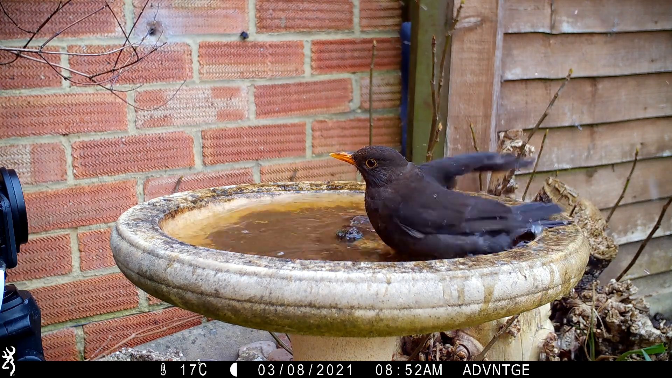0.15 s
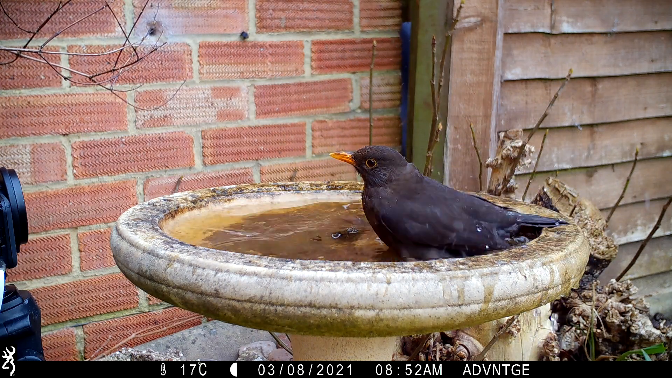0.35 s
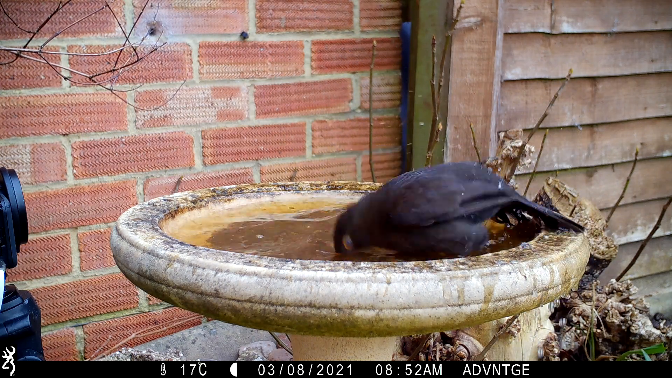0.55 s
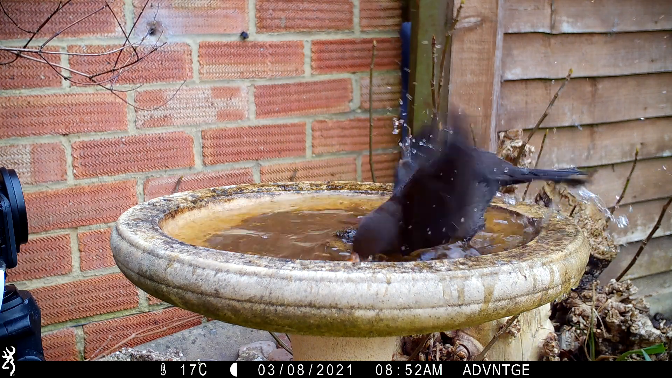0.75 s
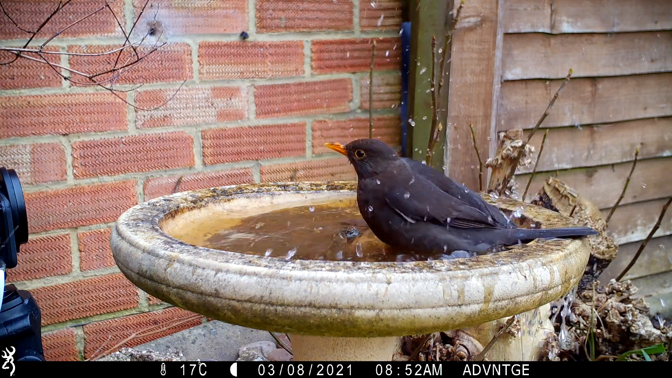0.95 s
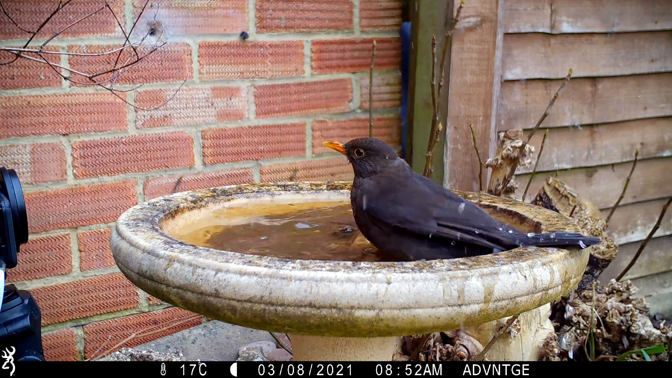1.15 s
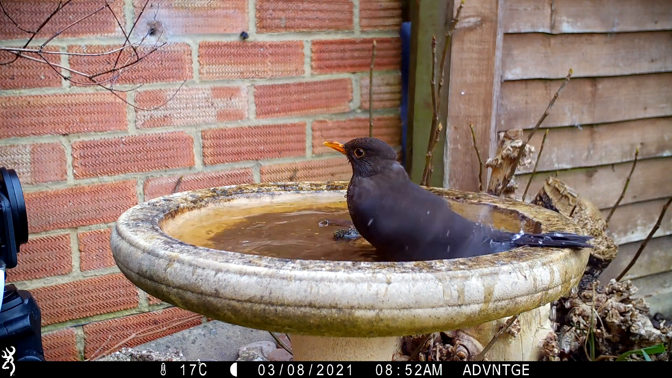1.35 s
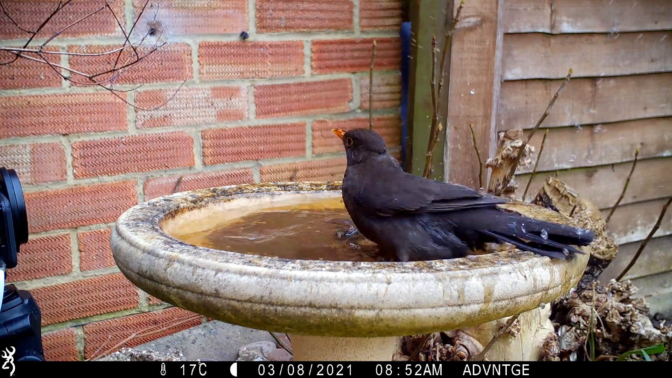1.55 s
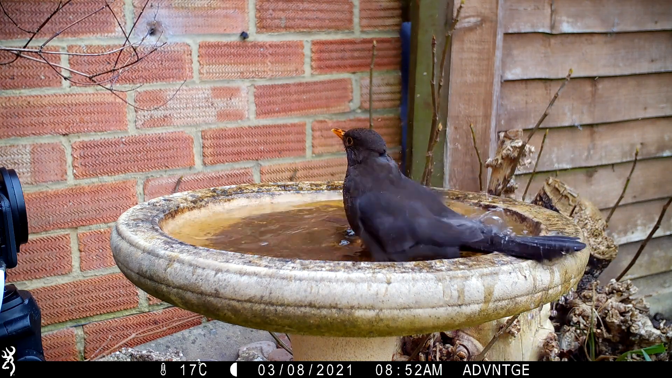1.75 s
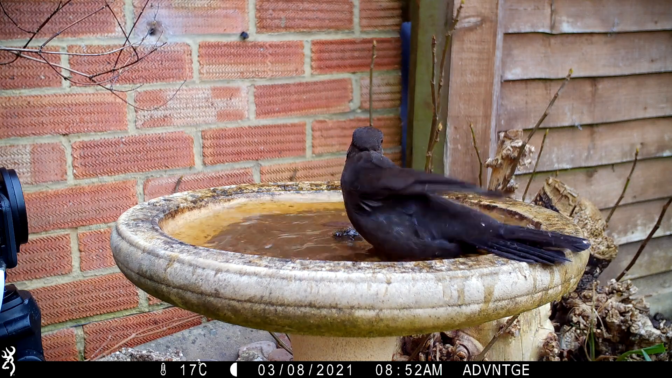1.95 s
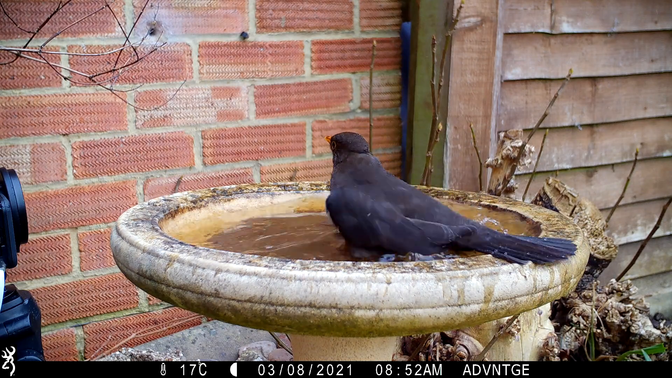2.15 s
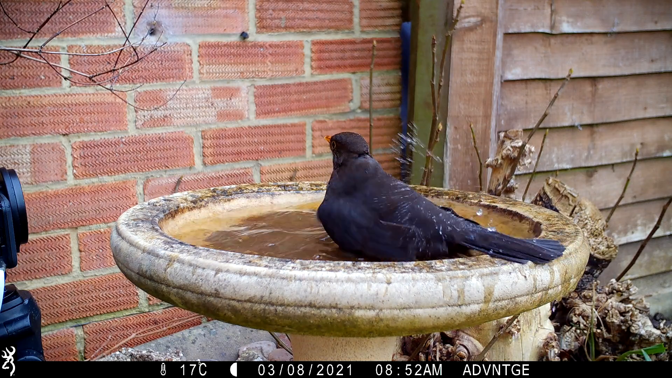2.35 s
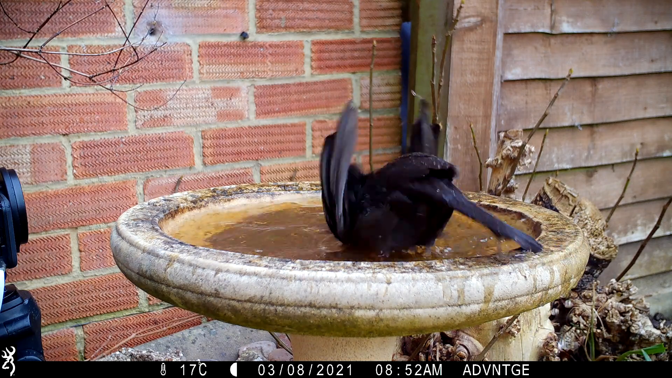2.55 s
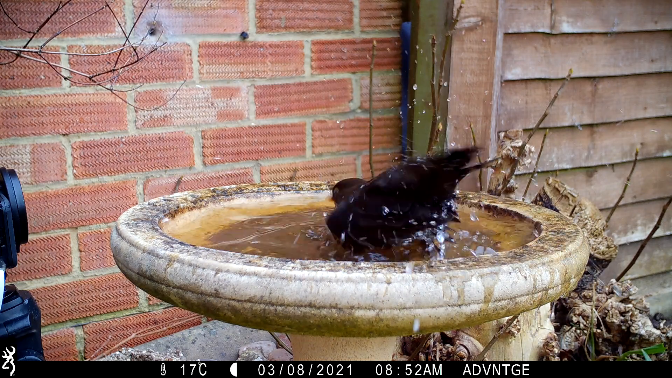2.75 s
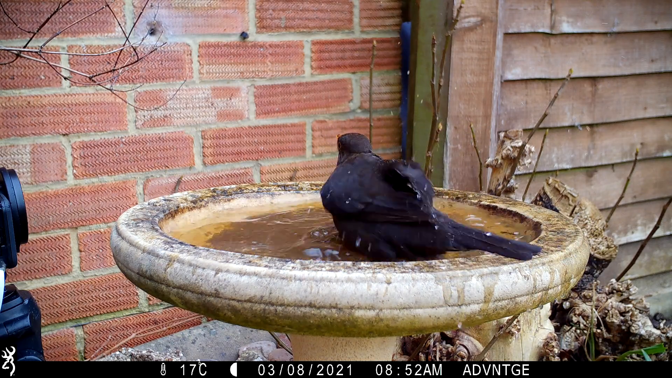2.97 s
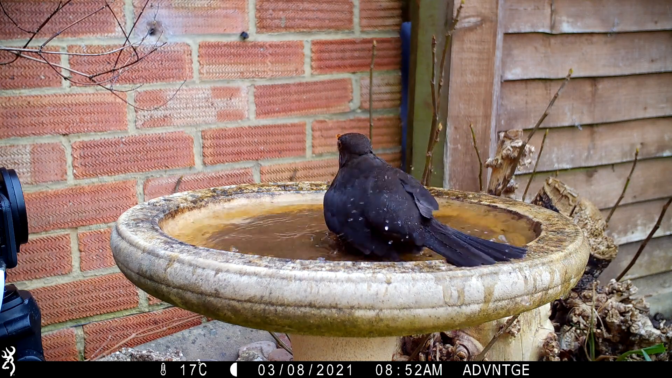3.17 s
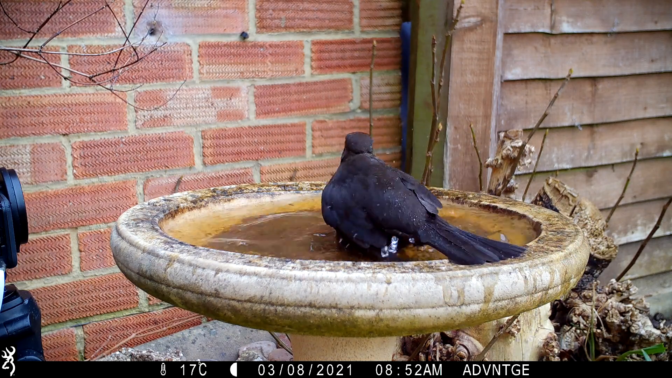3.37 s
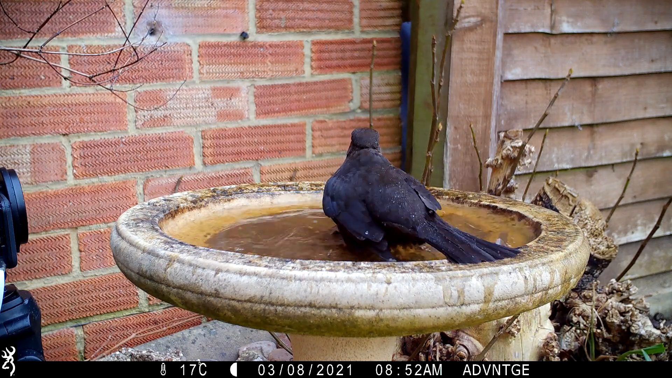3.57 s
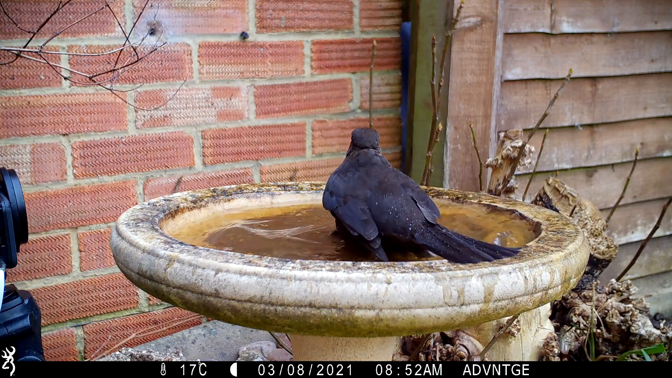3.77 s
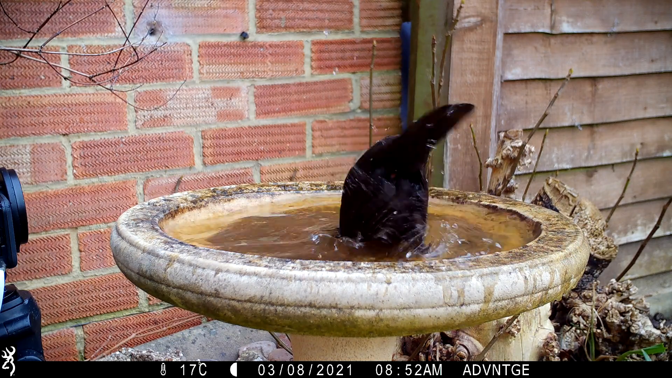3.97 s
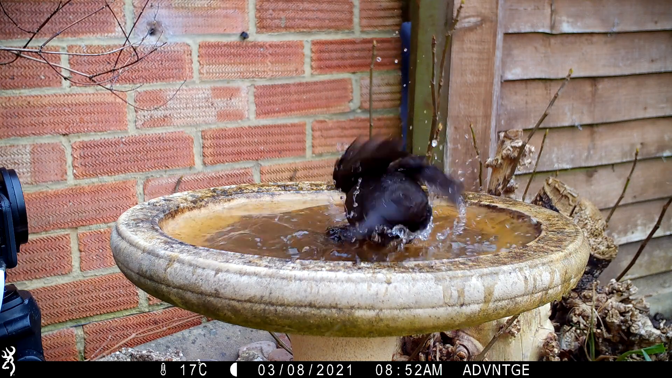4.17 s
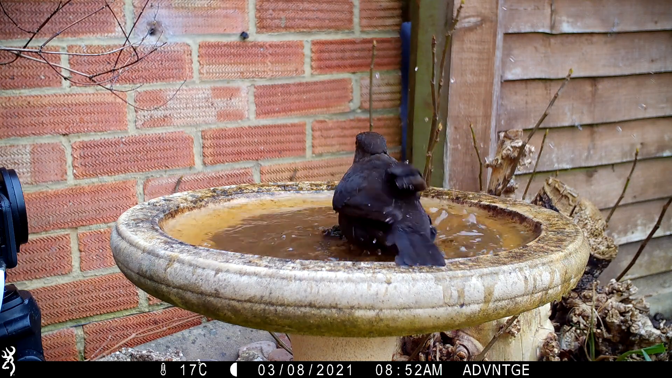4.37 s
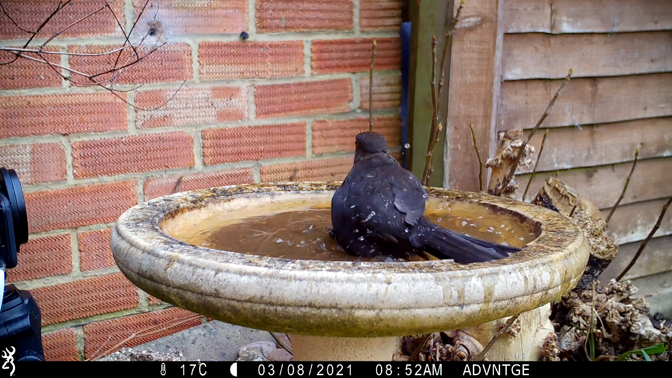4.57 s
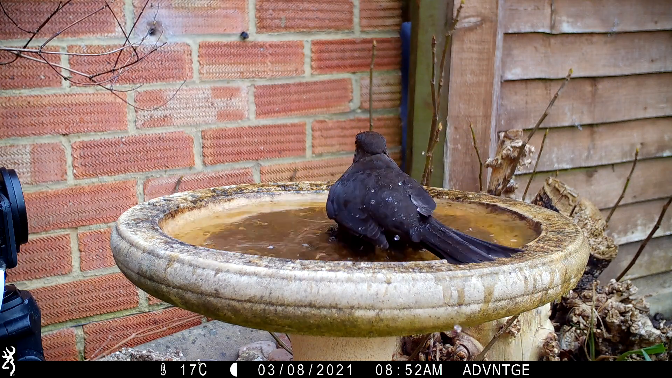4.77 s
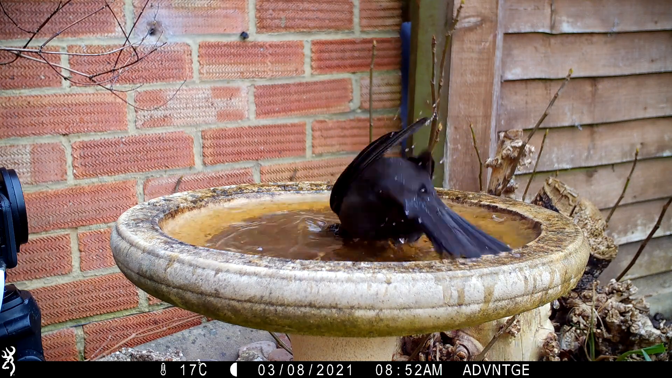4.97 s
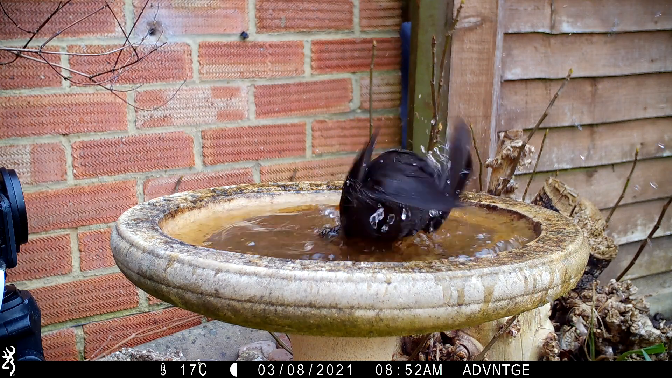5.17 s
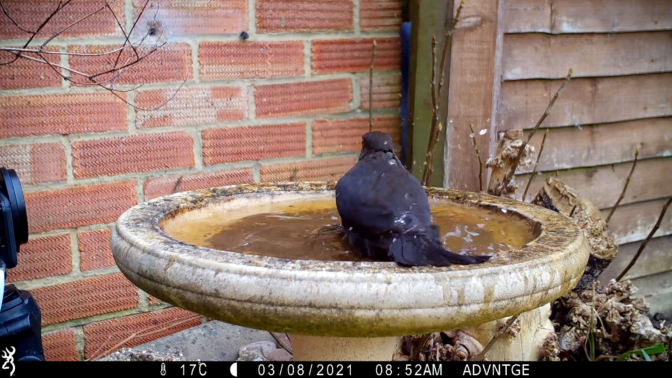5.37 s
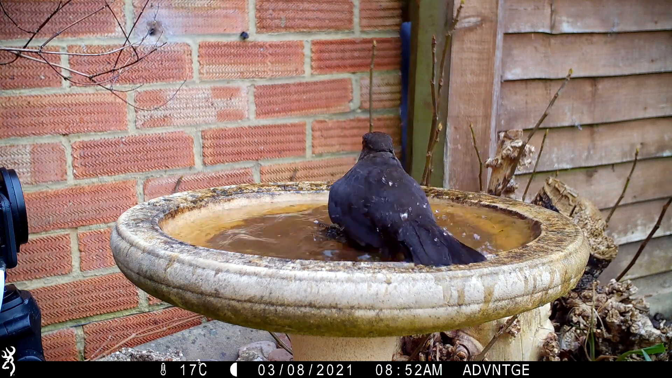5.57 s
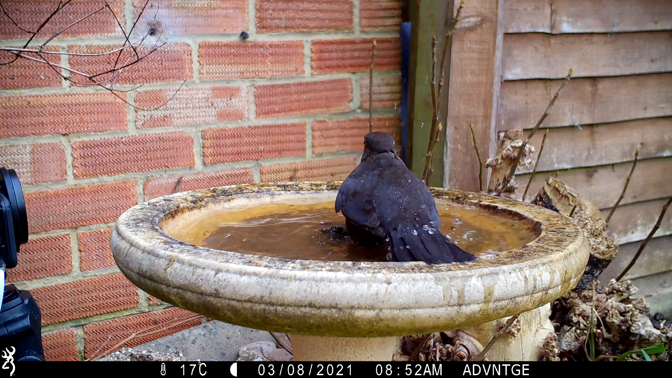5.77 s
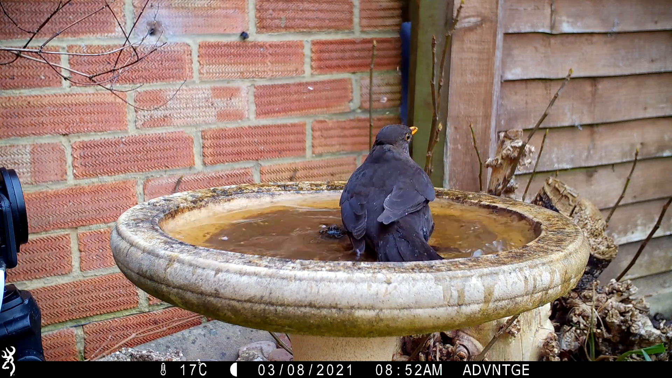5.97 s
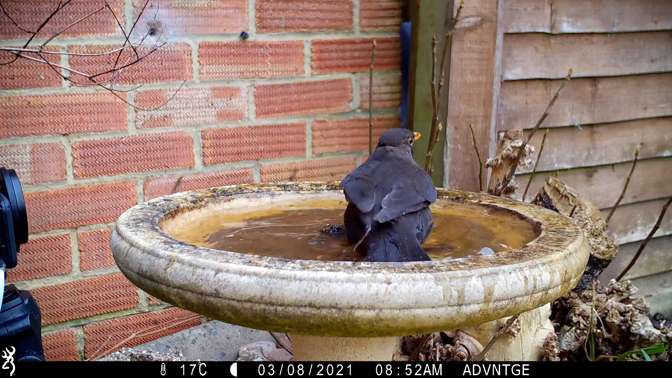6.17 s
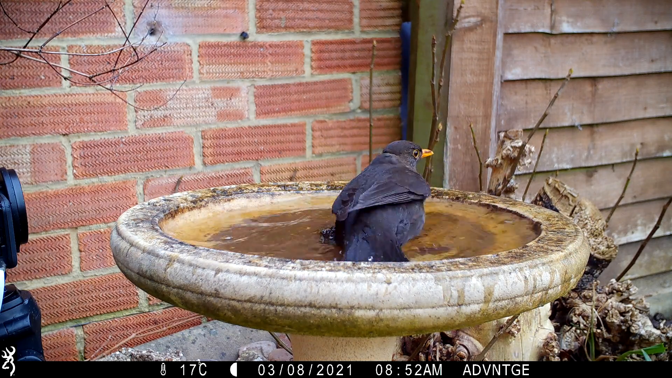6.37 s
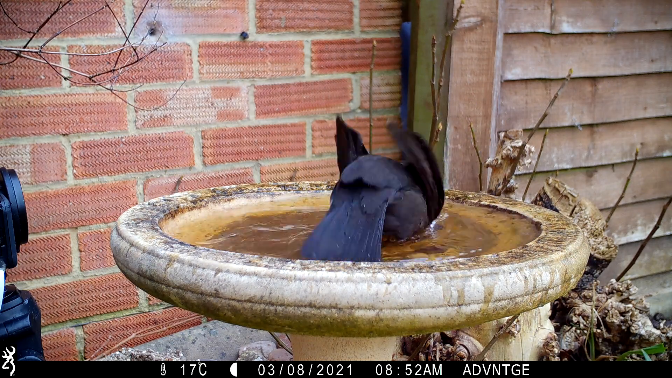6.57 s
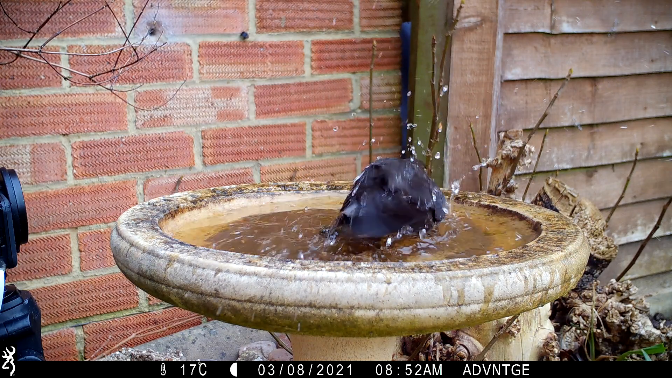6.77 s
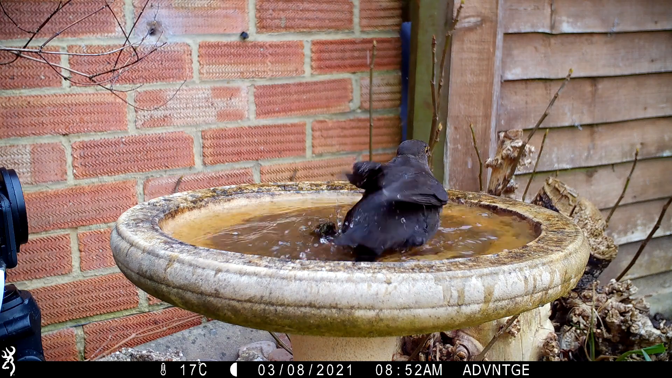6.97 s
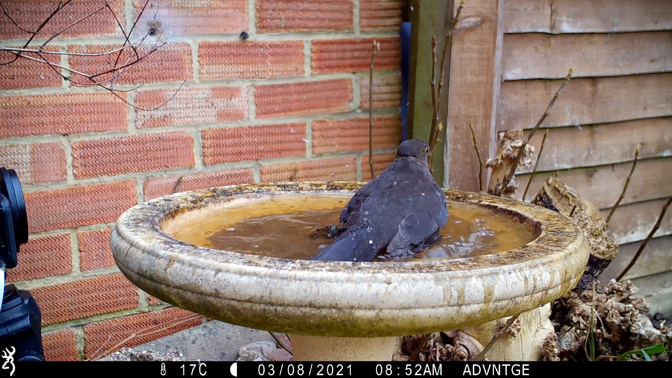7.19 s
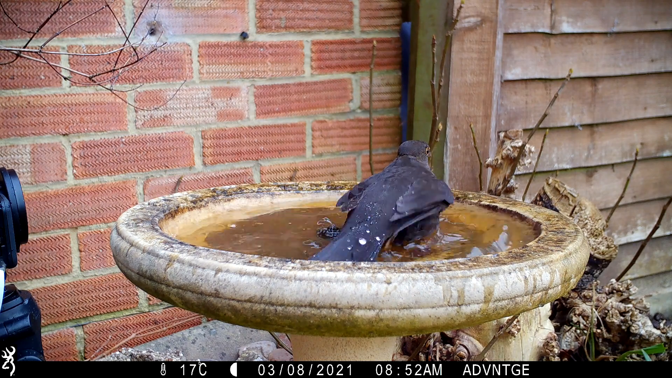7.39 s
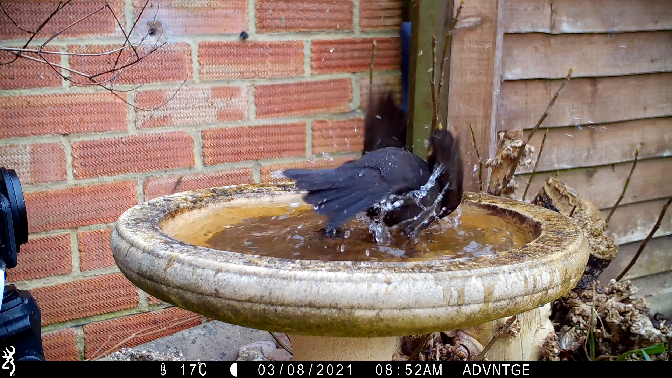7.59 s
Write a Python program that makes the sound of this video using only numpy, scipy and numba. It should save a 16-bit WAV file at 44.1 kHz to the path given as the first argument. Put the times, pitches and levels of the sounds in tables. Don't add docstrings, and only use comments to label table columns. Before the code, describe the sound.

Quick crisp wing slaps and small watery splashes in a garden birdbath, with drips, light sloshing, faint distant traffic and thin birdsong.

```python
import sys
import numpy as np
from scipy import signal
from scipy.fft import rfft, irfft, next_fast_len
from scipy.io import wavfile
from scipy.ndimage import uniform_filter1d
from numba import njit

SR = 44100
rng = np.random.default_rng(int(sys.argv[2]) if len(sys.argv) > 2 else 0)


def gain_from_db(level_db):
    decades = np.asarray(level_db, float) / 20
    return 10 ** decades


def waveform_to_disk(signal):
    frames = np.transpose(np.atleast_2d(signal))
    scaled = np.clip(frames, -1, 1) * 32767
    samples = np.round(scaled).astype(np.int16)
    wavfile.write(sys.argv[1], SR, samples)


N = 336483

# t/s, peak level/dB, air pocket f/Hz, crackle level/dB, air thud level/dB
WINGBEATS = [
    (1.3973, -35.5, 1900, 0, 0),
    (1.5414, -14, 1320, -16, -19),
    (1.663, -35.5, 1050, -1, 6.5),
    (1.669, -25.5, 1290, -11, -22),
    (1.794, -9, 1110, -26, -40),
    (1.908, -19.5, 1450, -6, -23),
    (1.9106, -12, 3240, -31, -15.5),
    (2.036, -5.5, 1250, -21, -57),
    (2.173, -36, 1590, -2.5, -2),
]


def band(x, lo_hz, hi_hz):
    return signal.sosfilt(signal.butter(2, [lo_hz, min(hi_hz, .45 * SR)], "bandpass", fs=SR, output="sos"), x)


def noise(lo_hz, hi_hz, size=N):
    x = band(rng.standard_normal(size), lo_hz, hi_hz)
    return x / x.std()


def add(out, s, x):
    i = max(int(s * SR), 0)
    out[i:i + len(x)] += x[:len(out) - i]


def fade(t60, rise):
    t = np.arange(int(max(t60, .001) * SR) + 8) / SR
    e = (1 - np.exp(-(t / rise) ** 2)) * np.exp(-np.log(1000) * t / max(t60, .001))
    return e / e.max()


def walk(rate):
    k = int(SR / rate)
    held = np.repeat(rng.standard_normal(N // k + 1), k)
    return uniform_filter1d(uniform_filter1d(held, k), k)[:N]


def ring(hz, t60, rise, climb=0., ramp_s=1.):
    e = fade(t60, rise)
    octaves = np.minimum(climb * (np.arange(len(e)) / SR) ** 2 / ramp_s, 2)
    pitch = np.minimum(hz * 2 ** octaves, .45 * SR)
    return e * np.sin(2 * np.pi * np.cumsum(pitch) / SR)


def clap(hz, width_s):
    t = np.arange(-66, 200) / SR
    return -np.exp(-(t / width_s) ** 2) * np.sin(2 * np.pi * hz * t) * 0.73


@njit
def scatter(size, start, step, cycles, gain, rise, climb):
    out = np.zeros(size)
    for k in range(len(start)):
        phase = 0.
        for i in range(min(int(cycles[k] / step[k]), size - start[k])):
            u = i * step[k]
            phase += min(step[k] * 2 ** (climb * u), .45)
            e = (1 - np.exp(-(u / rise) ** 2)) * np.exp(-6.9 * u / cycles[k])
            out[start[k] + i] += gain[k] * e * np.sin(2 * np.pi * phase)
    return out


def far_traffic():
    # f/Hz, level/dB per Hz
    colour_table = [(20, -16.5), (160, -11), (310, -6.5), (620, -6), (1120, -6), (1500, -1), (3500, -7.5),
                    (4600, -21), (5800, -29.5), (7000, -41), (8600, -44), (12000, -43), (16000, -46.5)]
    # f/Hz, width/Hz, level/dB
    housing = [(399, 25.6, 2), (630, 68, 5.5), (995, 151, 3.5), (1479, 77, 3.5), (1890, 65, -33),
               (2630, 150, -3.5), (3514, 21, -1)]
    size = next_fast_len(N + N % 2, True)
    f = np.maximum(np.arange(size // 2 + 1) * SR / size, 1)
    hz, db = np.transpose(colour_table)
    peaks = sum(gain_from_db(g) ** 2 / (1 + (2 * (f - c) / w) ** 2) for c, w, g in housing)
    colour = gain_from_db(np.interp(np.log(f), np.log(hz), db)) * np.sqrt(1 + gain_from_db(14) * peaks)
    spectrum = rfft(rng.standard_normal(size)) * colour
    swell, out = walk(0.71), 0
    for octave in np.arange(4, 14.6, .5):
        part = np.clip(1 - 2 * abs(np.log2(f) - octave), 0, 1)
        out = out + irfft(spectrum * part, size)[:N] * gain_from_db(.8 * swell + 1.5 * walk(9))
    return out / out.std() * gain_from_db(-49.5)


def camera():
    hum_settings = (63, 27, -80.5, 101, -73)
    whine_hz, whine_db, flip_hz = 7796.3, -79.5, 29.78
    t = np.arange(N) / SR
    hz, width, db, mains_hz, mains_db = hum_settings
    rumble = gain_from_db(db) * noise(hz - width / 2, hz + width / 2)
    hum = gain_from_db(mains_db + 2.2 * walk(6)) * np.sin(2 * np.pi * mains_hz * t)
    flips = np.tanh(16 * np.sin(2 * np.pi * flip_hz * (t - .0133)))
    return rumble + hum + gain_from_db(whine_db + 3.5) * flips * np.sin(2 * np.pi * whine_hz * t)


def songbirds():
    # t/s, length/s, start f/Hz, end f/Hz, level/dB
    whistles = [(0.608, 0.055, 3930, 3860, -57.5), (2.225, 0.11, 4220, 4380, -68),
                (3.017, 0.051, 4970, 5200, -73), (3.283, 0.096, 3380, 3265, -59),
                (4.887, 0.014, 4090, 3800, -54), (4.898, 0.021, 4330, 3930, -55),
                (4.927, 0.011, 3690, 4160, -53), (4.968, 0.014, 4090, 3840, -54),
                (5.042, .016, 4300, 4200, -60), (5.082, 0.019, 3770, 4400, -58),
                (5.092, 0.0064, 4370, 4030, -57), (5.126, 0.017, 4550, 4440, -60),
                (5.143, 0.018, 4000, 3330, -55.5), (5.169, 0.0132, 3900, 4840, -57),
                (5.22, 0.014, 4000, 4080, -57), (5.23, 0.021, 5040, 4260, -65),
                (5.254, 0.026, 3740, 4130, -61), (5.282, .034, 3800, 3720, -55.5),
                (5.334, 0.022, 4100, 4200, -60), (5.356, .012, 4800, 4340, -61),
                (5.419, 0.026, 3950, 4340, -60), (5.45, .011, 4230, 3950, -58),
                (5.513, 0.032, 4160, 3980, -60), (5.83, 0.09, 4130, 4180, -67),
                (4.993, .025, 4000, 3820, -66), (5.176, .02, 4480, 4600, -67),
                (5.31, 0.012, 3700, 3300, -67), (5.38, .03, 4450, 4500, -70), (5.44, .015, 4500, 4760, -64)]
    # delay t/s, level/dB
    echoes = [(.011, -11), (.027, -12), (.052, -14)]
    out, waver = np.zeros(N), 1 + .012 * walk(220)
    for s, long, hz0, hz1, db in whistles:
        u = np.linspace(0, 1, max(int(long * SR), 8))
        pitch = (hz0 + (hz1 - hz0) * u) * waver[int(s * SR):][:len(u)] ** min(.02 / long, 1)
        swell = np.sqrt(np.sin(np.pi * u).clip(0))
        add(out, s, gain_from_db(db + 6.0) * swell * np.sin(2 * np.pi * np.cumsum(pitch) / SR))
    e = fade(0.4, rise=0.01)
    blur = signal.fftconvolve(out, e * rng.standard_normal(SR)[:len(e)])[:N]
    heard = out * gain_from_db(4 * walk(160)) + gain_from_db(-41) * blur
    for delay, db in echoes:
        add(heard, delay, gain_from_db(db) * out)
    return heard


def knocks():
    # t/s, peak level/dB, blow f/Hz, ring level/dB, bounce after t/s
    blows = [
        (0.6008, -15.5, 1950, -11, .004),
        (3.9241, -12.5, 2150, -15, .0042),
        (5.0058, -13, 1950, -22, .004),
        (6.5875, -16, 1900, -9.5, .0042),
        (7.488, -13.5, 1950, -13, .004),
    ]
    # f/Hz, level/dB, 60 dB fall t/s
    casing = [(1787, 0, .075), (1690, -11, .05), (1340, -13, .06), (2400, -13, .03), (1000, -4, .012)]
    out, shake, e = np.zeros(N), gain_from_db(2.5 * walk(250)), fade(.03, rise=.001)
    t = np.arange(-66, 100) / SR
    bump = np.exp(-(t / np.where(t < 0, .00036, .00052)) ** 2)
    for s, db, hz, ring_db, bounce_s in blows:
        grit = rng.standard_normal(SR // 10)
        add(out, s, gain_from_db(db) * bump * np.cos(2 * np.pi * hz * t))
        add(out, s + bounce_s, gain_from_db(db - 10) * clap(2100, width_s=.0004))
        add(out, s + .002, gain_from_db(db - 10) * e * band(grit, 900, 2600)[:len(e)])
        for mode_hz, mode_db, t60 in casing:
            tone = ring(mode_hz, t60, rise=0.001)
            level = gain_from_db(db + ring_db + mode_db)
            add(out, s + 0.001866, level * tone * shake[int(s * SR):][:len(tone)])
    return out


def grains(gain, lo_hz, hi_hz, cycles, spread_db, tilt_db, count):
    when, pitch, big, long = rng.random((count, 4)).T
    size_db = spread_db * np.minimum(-np.log(1 - big), 4) + tilt_db * pitch
    start = (when * N).astype(np.int64)
    step = lo_hz * (hi_hz / lo_hz) ** pitch / SR
    out = scatter(N, start, step, cycles * (.5 + long * 2), gain_from_db(size_db), 0.44, 0.0036)
    return out / out.std() * gain


def sloshing():
    # t/s, level/dB
    stir = [
        (0, -48.5),
        (2.07, -51.5),
        (2.38, -54),
        (2.95, -47.5),
        (3.39, -54.5),
        (4.25, -48.5),
        (5.71, -53),
        (6.5, -51.5),
        (7.6, -52),
    ]
    slosh_db = np.interp(np.arange(N) / SR, *np.transpose(stir))
    gain = gain_from_db(slosh_db - 5 + 3 * walk(14))
    return grains(gain, 1200, 3900, cycles=20, spread_db=2.6, tilt_db=-3, count=2200)


def shower_gain(column):
    # t/s, length/s, spray level/dB, finest mist level/dB
    showers = [(0.037, 0.12, -59, -75), (0.15, 0.087, -56, -85), (0.255, 0.069, -69, -80),
               (0.331, 0.066, -60.5, -81), (0.587, 0.038, -71, -79), (0.714, .04, -66, -84),
               (0.78, 0.15, -66, -89), (1.115, 0.18, -68, -77), (1.19, 0.22, -68, -84),
               (1.37, 0.2, -72, -89), (1.514, 0.13, -62, -94), (1.783, 0.2, -69, -93),
               (2.02, 0.091, -65, -81), (2.324, 0.047, -64, -97), (2.74, 0.15, -63, -100),
               (3.143, 0.03, -63, -82), (4.127, 0.063, -68, -87), (4.18, 0.085, -69, -80),
               (4.287, 0.035, -77, -93), (4.558, 0.046, -68, -84), (5.065, 0.1, -71, -87),
               (5.203, 0.15, -65, -85), (6.212, 0.044, -86, -104), (6.702, 0.13, -71, -98),
               (6.866, 0.063, -71, -90), (7.02, 0.06, -64, -97), (7.56, 0.039, -69, -87)]
    out = np.zeros(N)
    for row in showers:
        u = np.linspace(0, 1, int(row[1] * SR))
        add(out, row[0], gain_from_db(row[column]) * np.sqrt(np.sin(np.pi * u ** .7).clip(0)))
    return out


def showers_of_spray():
    spray = grains(shower_gain(2) + gain_from_db(-74.5), 3040, 6920, cycles=18, spread_db=1.0, tilt_db=-5.5, count=3500)
    mist = grains(shower_gain(3) + gain_from_db(-97.5), 8500, 15000, cycles=10, spread_db=9.5, tilt_db=-11.0, count=2500)
    return spray + mist


def beat_drops(column):
    # f/Hz, level/dB, finest f/Hz, finest level/dB, level change/dB per dB of the beat
    beat_spray = (4453, -31, 9300, -45.5, 0.5)
    hz, db = beat_spray[column:column + 2]
    return [(s, db + beat_spray[-1] * (beat_db + 16.5), hz) for s, beat_db, *_ in WINGBEATS]


def ticks(table, width_s, hiss_db, hiss_t60):
    out, e = np.zeros(N), fade(hiss_t60, rise=0.00051)
    for s, db, hz in table:
        grit = rng.standard_normal(SR // 10)
        add(out, s, gain_from_db(db) * clap(hz, width_s))
        add(out, s + 0.000982, gain_from_db(db + hiss_db) * e * band(grit, 0.77 * hz, 1.054 * hz)[:len(e)])
    return out


def droplets():
    # t/s, peak level/dB, f/Hz
    plain = [(.0486, -25, 4500), (.18, -31, 5050), (.2184, -39, 4550), (.2578, -37.5, 5630),
             (.4165, -26, 4960), (.602, -39, 6040), (.7392, -35, 5500), (.796, -39, 5300),
             (.8064, -34, 4570), (.8672, -34, 5400), (.8836, -31, 5350), (1.1393, -29.5, 5640),
             (1.2042, -36, 5360), (1.216, -28.5, 5060), (1.2582, -33, 4350), (1.296, -33, 4300),
             (1.4272, -39, 5150), (1.954, -40, 4530), (2.7713, -32, 5470), (2.8325, -29, 4100),
             (4.174, -44, 4500), (4.21, -41, 5600), (4.6418, -41.5, 4530), (5.006, -45, 4580),
             (5.1153, -41, 5200), (5.2215, -45, 5100), (5.262, -38.5, 5360), (5.2803, -33, 4550),
             (7.1561, -45, 4520), (6.514, -43.5, 4230), (6.752, -44, 4800), (6.881, -49, 5150),
             (6.912, -52, 5560), (7.0306, -42, 5000), (7.068, -49, 5200), (7.22, -51, 4500),
             (6.82, -55.5, 6400), (7.177, -60, 6600), (6.22, -54, 5580), (3.999, -55, 6460),
             (4.141, -50, 6800), (4.226, -43, 6540), (5.66, -54, 4300), (5.75, -47, 4300),
             (6.37, -57, 5600), (1.1686, -42, 6200), (1.1686, -40, 2800), (1.2865, -39, 3300),
             (1.5615, -39, 3400), (6.54, -52, 5200), (7.6076, -41, 5370)]
    # t/s, peak level/dB, f/Hz
    finest = [(.0483, -51, 11300), (.0772, -47, 10400), (.1131, -39, 9100), (.1795, -46, 9100),
              (.2154, -48, 9930), (.2573, -42, 8950), (.3341, -51, 9330), (.4095, -61, 9450),
              (.601, -52, 8800), (.6394, -53, 11700), (.7387, -45, 9010), (.7906, -53, 12500),
              (.8674, -59, 8860), (.9981, -49, 8820), (1.1403, -56, 12800), (1.2052, -53, 10100),
              (1.254, -56, 9930), (1.4277, -45, 10200), (1.509, -42, 11400), (1.9525, -49, 9980),
              (2.3521, -53, 11100), (2.8499, -53, 12000), (3.999, -45, 10500), (4.6415, -40, 9500),
              (5.0724, -51, 8900), (5.2215, -44, 8800), (5.2939, -47, 10300), (6.1389, -61, 11400),
              (6.8814, -46, 11100), (7.0309, -52, 9400)]
    coarse_ticks = ticks(plain + beat_drops(column=0), width_s=0.00019, hiss_db=0, hiss_t60=0.017)
    fine_ticks = ticks(finest + beat_drops(column=2), width_s=0.000061, hiss_db=-12.5, hiss_t60=0.031)
    return coarse_ticks + fine_ticks


def bubbles():
    # t/s, peak level/dB, start f/Hz, rise/octaves a second, life/s
    trapped = [(.2645, -30.5, 1172, 30.5, 0.032), (1.249, -37, 2600, 2, .008),
               (4.101, -34, 1550, 3, 0.0087), (7.483, -37, 1480, 5, .004), (.2585, -33.5, 2730, 11, 0.011),
               (.274, -39, 2660, 5, .008), (1.8975, -32, 3000, -10, .004), (.834, -27.5, 1890, 2, 0.043),
               (.85, -40, 2170, 5, 0.012), (.885, -32.5, 1020, 5, 0.013), (.7375, -33.5, 1750, 2, 0.013),
               (.815, -41, 2080, 18, 0.0079), (.81, -30, 1700, 0, 0.0028), (0.377, -40.5, 3940, 2, 0.0046),
               (1.824, -40, 1560, 53, 0.0068), (2.775, -26.5, 1795, -9, 0.019),
               (2.7964, -25, 2040, 19, 0.0077), (2.783, -40, 3600, 4, 0.0052), (2.792, -32, 1800, 5, .004),
               (2.842, -39.5, 2180, 16, 0.01), (3.505, -35, 2270, 10, 0.005),
               (3.512, -33.5, 2380, 6, 0.0073), (3.525, -47, 2480, 1, .018), (3.624, -35, 2780, 13, 0.01),
               (3.636, -40, 2690, 3, 0.0086), (3.648, -48, 2830, -2, .03), (3.585, -44.5, 1475, 0, .035),
               (4.053, -23.5, 1230, 1, 0.0045), (4.188, -32, 1670, 14, 0.0072),
               (4.201, -32.5, 2060, 22, 0.0054), (4.3217, -26.5, 1645, -1.5, 0.039),
               (5.912, -39.5, 1940, 1.5, 0.026), (6.317, -44.5, 2630, 4, .015),
               (6.644, -35, 1790, -6, 0.017), (6.721, -39, 3430, 6, 0.0081),
               (6.73, -30.5, 2540, 21, 0.0055), (6.817, -40.5, 1540, -4, 0.022),
               (6.926, -38, 2640, 24, 0.012), (7.05, -39, 2690, 10, .014), (7.613, -31.5, 1710, 3, 0.0063)]
    # t/s, peak level/dB, f/Hz
    drips = [(1.704, -45, 2250), (1.729, -32.5, 2380), (2.703, -39.5, 3810), (2.977, -36, 2450),
             (3.348, -36.5, 3030), (4.609, -32, 2500), (5.593, -34.5, 1880), (5.737, -34, 1360),
             (6.164, -34.5, 1460), (6.327, -34.5, 1440), (6.389, -40.5, 3200), (6.417, -33, 1800),
             (6.7806, -36, 2180), (7.1664, -39.5, 2300), (7.2775, -39, 2670), (7.372, -51, 3040),
             (7.574, -43, 3710)]
    out, wobble = np.zeros(N), gain_from_db(1.5 * walk(220))
    from_drips = [(s, db - 7.0, hz, 6, .011) for s, db, hz in drips]
    for s, db, hz, climb, life in list(trapped) + from_drips:
        grit = rng.standard_normal(SR // 4)
        t60 = 3.2 * life * (1 + max(climb, 0) / 20)
        tone = ring(hz, t60, rise=0.00031, climb=climb, ramp_s=life)
        burst = np.exp(-(np.arange(len(tone)) / SR / life) ** 6)
        add(out, s, gain_from_db(db) * tone * burst)
        e = fade(3.1 * life, rise=0.0023)
        froth = e * band(grit[:len(e)], .8 * hz, 1.3 * hz) * 1.3
        add(out, s - .001, gain_from_db(db - 4) * froth)
    return out * wobble


def slaps():
    # t/s, peak level/dB, air pocket
    # f/Hz, crackle level/dB
    splashes = [(.058, -22, 1540, -22), (0.087, -28.5, 1020, -10.5), (0.217, -31.5, 1730, -8.5),
                (.258, -40, 2900, -1), (0.356, -39.5, 1190, -2), (.416, -20.5, 3700, -30),
                (0.444, -27, 2150, -31), (.672, -38, 1520, -7.5), (0.736, -20, 2200, -19),
                (0.809, -26, 1750, -15), (1.077, -34, 1790, -10.5), (1.1408, -38, 1500, -20),
                (1.547, -18, 1700, -28), (4.0526, -28, 1200, -30), (4.134, -38, 2000, -12),
                (4.147, -38, 1700, -20), (4.174, -36, 2200, -12), (7.6109, -29, 1100, -30),
                (7.477, -39, 2200, -20), (1.282, -35.5, 2700, -15.5), (1.2153, -30, 1150, -13),
                (1.261, -25, 2370, -27), (1.431, -28, 1390, -18), (1.488, -37.5, 1570, -3.5),
                (1.588, -27, 2580, -30), (1.894, -35, 3040, -13), (2.088, -31.5, 1230, -13.5),
                (2.525, -31, 1550, -17), (2.557, -18.5, 1760, -27), (2.829, -35.5, 1520, -13.5),
                (3.164, -34, 1470, -7), (3.318, -39, 1820, -6), (4.104, -32.5, 1590, -7.5),
                (4.58, -44.5, 1650, 4), (5.263, -33.5, 1520, -10), (6.183, -35.5, 1580, -16),
                (6.9, -29, 1080, -19), (7.032, -38.5, 1110, -3), (7.526, -32.5, 2230, -14)]
    out, size = np.zeros(N), N - SR // 2
    torn = band(noise(600, 3000) * gain_from_db(6 * walk(500)), 500, 3600)
    snap, heave = fade(0.016, rise=0.0048), fade(0.054, rise=0.0053)
    tips = [(s - .007, db - 23.5, hz, -6, -8) for s, db, hz, *_ in WINGBEATS]
    body = [(s, db, hz, crackle_db, crackle_db - 5.5) for s, db, hz, crackle_db in splashes]
    for k, (s, db, hz, crackle_db, thud_db) in enumerate(body + WINGBEATS + tips):
        e, lead_s = (heave, .006) if k < len(body) else (snap, .0005)
        add(out, s, gain_from_db(db + .7) * clap(2000, width_s=.00025))
        add(out, s + .0012, gain_from_db(db - 10) * ring(hz, t60=.006, rise=.0002))
        piece = torn[min(int(s * SR), size):][:len(e)]
        add(out, s - lead_s, gain_from_db(db + crackle_db + 0.5) * band(e * piece, 0.41 * hz, 2.2 * hz))
        add(out, s, gain_from_db(db + thud_db - 2.5) * ring(420, t60=0.0026, rise=0.00072))
    return out


def scene():
    # delay t/s, level/dB
    wall = [(.0053, -11)]
    # delay t/s, level/dB
    fence = [(.0095, -40), (0.011, -32.5)]
    wings, blips = slaps(), bubbles()
    low_water = droplets() + showers_of_spray() + sloshing()
    out = wings + blips + low_water
    e = fade(0.088, rise=0.00087)
    blur = signal.fftconvolve(out, e * noise(700, 4000, size=SR)[:len(e)])[:N]
    out = out + gain_from_db(-44) * blur
    facing = wings + gain_from_db(-8.5) * low_water + gain_from_db(4) * blips
    for delay, db in wall + fence:
        add(out, delay, gain_from_db(db) * facing)
    near = band(out + knocks(), 262, 20000)
    return (near + songbirds() + far_traffic() + camera())[None]


def top_cut(x):
    return signal.sosfilt(signal.butter(12, 16360, fs=SR, output="sos"), x)


def record(dry):
    cut = signal.sosfilt(signal.ellip(8, .2, 40, 15800, fs=SR, output="sos"), dry)
    return top_cut(cut)


dry = scene()
out = record(dry)
waveform_to_disk(out)
```